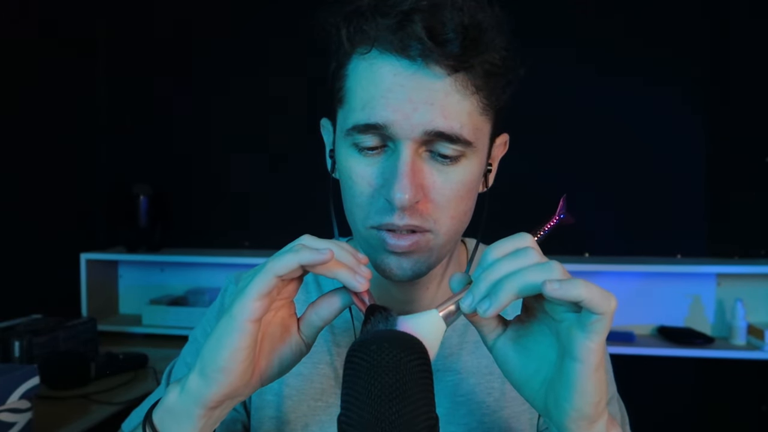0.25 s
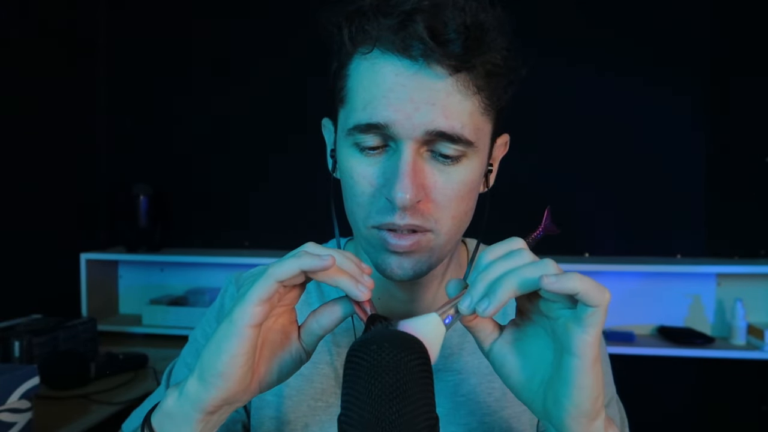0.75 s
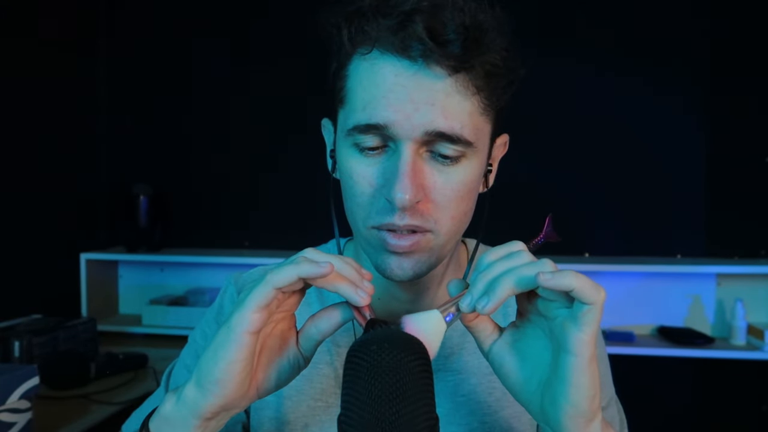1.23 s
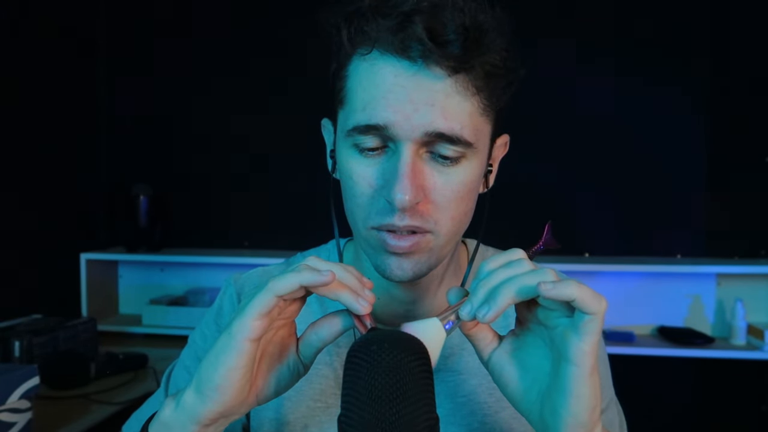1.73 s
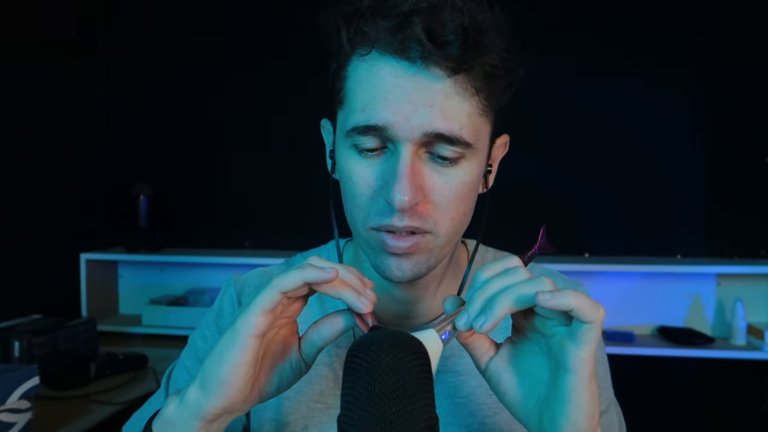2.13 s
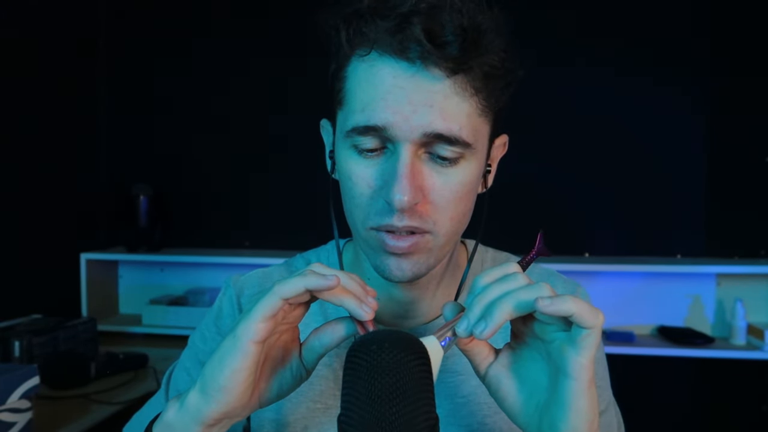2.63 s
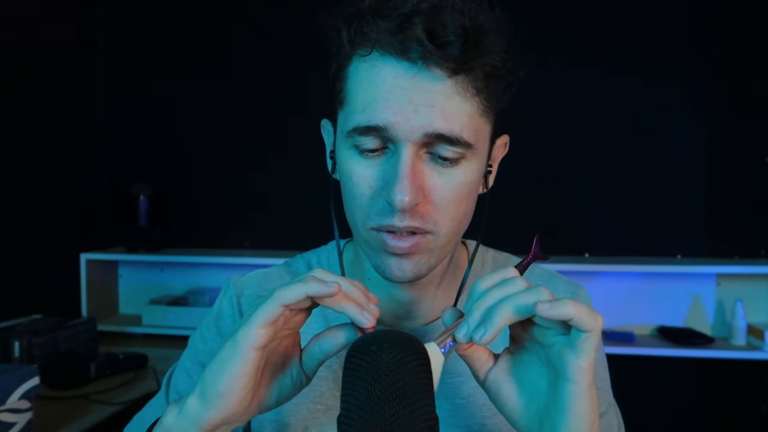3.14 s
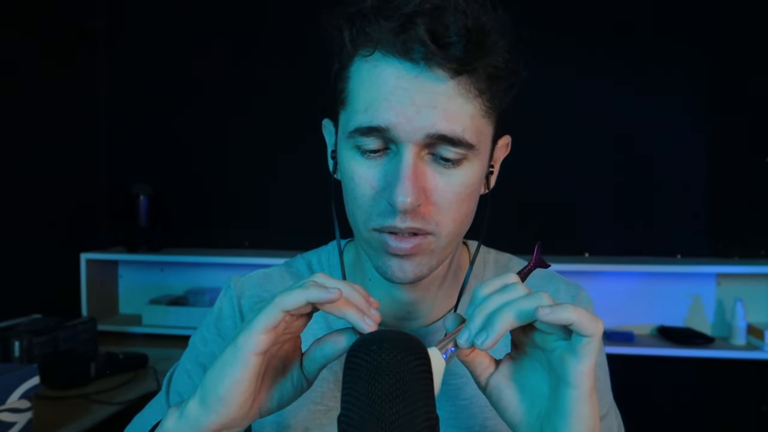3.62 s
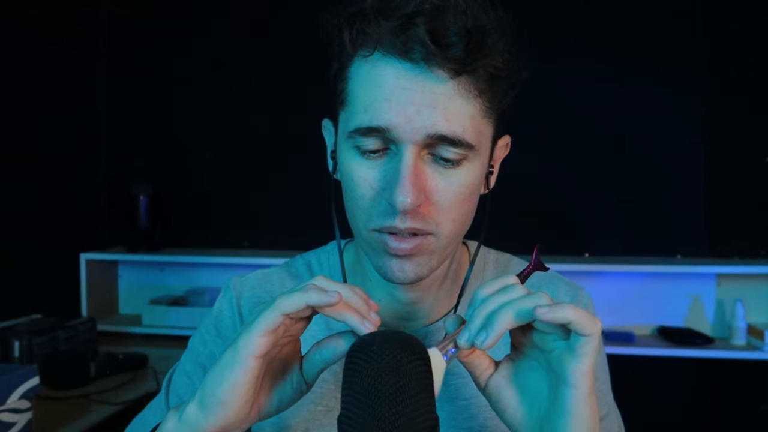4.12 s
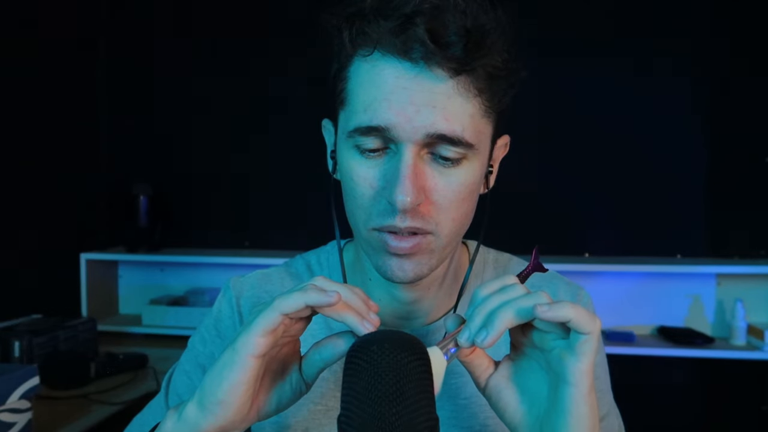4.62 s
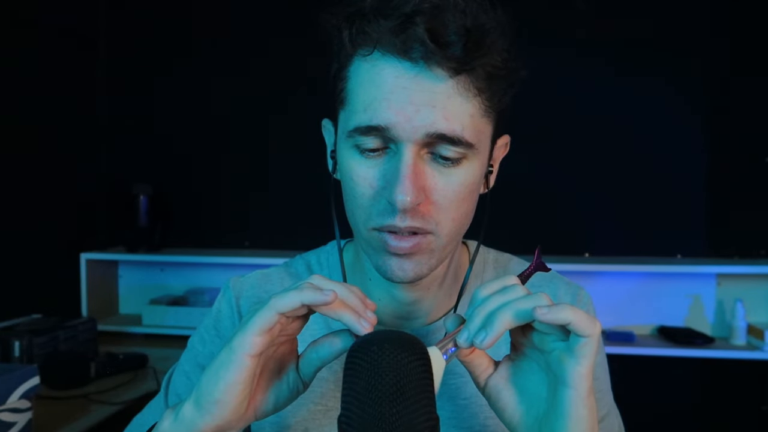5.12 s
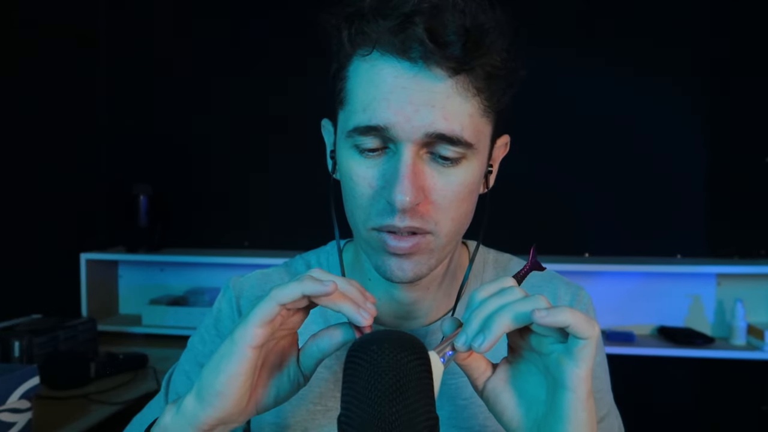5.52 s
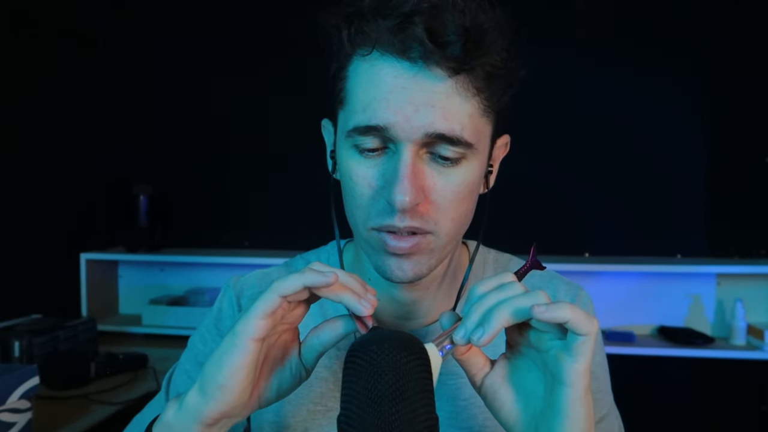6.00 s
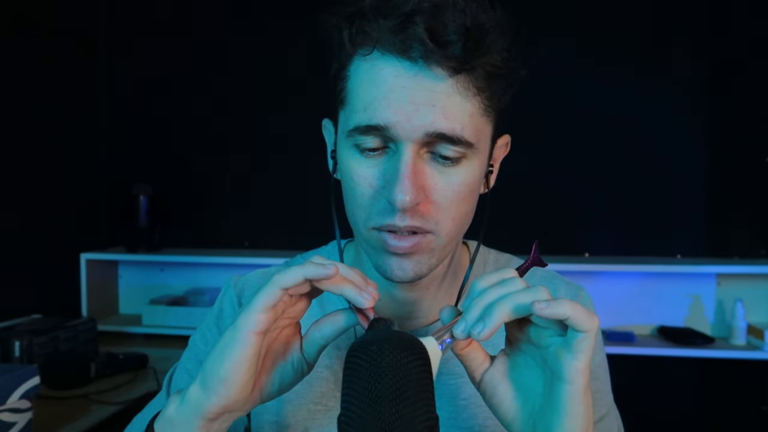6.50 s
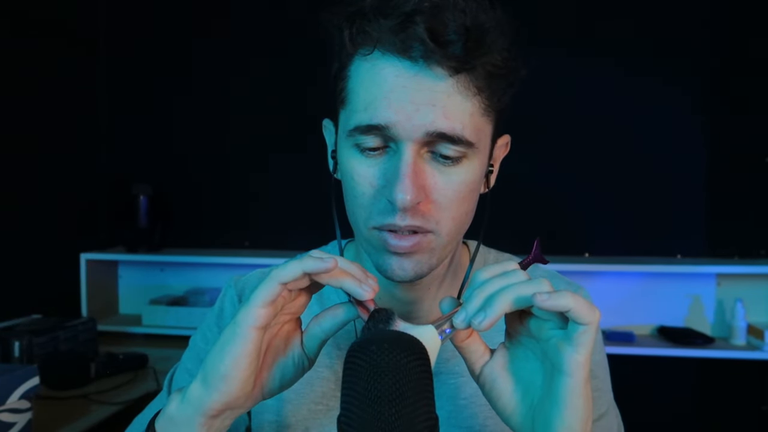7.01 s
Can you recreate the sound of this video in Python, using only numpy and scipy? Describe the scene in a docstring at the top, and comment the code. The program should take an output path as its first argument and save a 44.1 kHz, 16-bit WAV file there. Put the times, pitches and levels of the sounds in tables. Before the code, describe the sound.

A soft brush sweeps to and fro over a foam-covered microphone, each quick stroke a deep thump with a dull scuff, over low hum.

```python
"""Brush on a foam-capped stereo microphone

A soft brush sweeps to and fro over the foam, working from the top down its left side and back up.
Each stroke pushes a pulse of air into the capsules (a deep thump), shakes the resonant stand, and drags
bristles over the foam: random slips filtered to a scuff, a dull rub, a rasp and a fine hiss, with short rings.
Filtered noise and steady sines make a quiet room with mains hum underneath."""
import sys
import numpy as np
from scipy import signal
from scipy.fft import rfft, irfft
from scipy.io import wavfile

SR = 44100
rng = np.random.default_rng(int(sys.argv[2]) if len(sys.argv) > 2 else 0)


def transcribe(u):
    """Save the signal u as a 16-bit wav file named by the first command-line argument.

    u: samples, shape (n,) or (channels, n), limited to [-1, 1]; the rate is SR.
    q: integer samples, one column per channel.
    """
    v = np.clip(np.atleast_2d(u).T, -1, 1)
    q = np.round(v * 32767).astype(np.int16)
    wavfile.write(sys.argv[1], SR, q)


N = 319964
TIME = np.arange(N) / SR   # s

# Brush strokes, forward and return in turn; each layer adds its own offset to these levels:
# (peak time [s], swell time [s], relative push [dB], relative rub [dB], relative bite [dB])
STROKES = [(0.026, .009, -14.5, -69, -51.5), (0.32, 0.037, -18.5, -52, -57),
           (0.578, 0.0075, -16, -53.5, -52.5), (0.897, 0.016, -14, -55, -50.5),
           (1.212, 0.01, -16, -48, -49.5), (1.509, 0.0064, -13, -51, -57), (1.768, 0.016, -17, -44.5, -52),
           (2.084, 0.02, -16, -52, -65), (2.381, 0.014, -18.5, -48, -44.5), (2.638, 0.02, -21.5, -47, -49),
           (2.921, 0.016, -12.5, -47.5, -42), (3.22, 0.016, -15, -46, -56), (3.483, 0.023, -15, -49, -41),
           (3.757, 0.015, -17, -45.5, -61), (4.05, 0.014, -15, -46.5, -42),
           (4.292, 0.0079, -16.5, -45, -68), (4.592, .014, -16.5, -45, -41.5),
           (4.882, 0.021, -16, -47.5, -49), (5.146, 0.011, -16, -42.5, -40.5),
           (5.40, 0.015, -17.5, -46, -71), (5.678, 0.019, -17, -43.5, -46.5), (5.945, 0.038, -15, -48, -46),
           (6.228, 0.012, -11.5, -45.5, -40.5), (6.518, 0.023, -16, -41.5, -50),
           (6.771, 0.022, -14, -44, -46), (7.029, 0.046, -13, -47, -52.5),
           (7.258, 0.0068, -13.5, -38, -43.5)]


def from_db(db):
    """Level to amplitude: 20 dB is a factor of ten."""
    return 10 ** (np.asarray(db) / 20)


def rms_one(x):
    """Normalises each channel to unit root-mean-square amplitude."""
    return x / np.sqrt(np.mean(x ** 2, axis=-1, keepdims=True) + 1e-20)


def sides(right_db):
    """Level-difference stereo: gains of the left (0 dB) and right capsule."""
    return from_db(np.vstack([0 * right_db, right_db]))


def colour(x, spectrum):
    """Spectral shaping: white noise of rms 1 takes on the given power density, in dB per Hz."""
    hz, db = np.transpose(spectrum)
    bins = np.maximum(np.arange(N // 2 + 1) * SR / N, 1)
    gain = from_db(np.interp(np.log(bins), np.log(hz), db))
    return np.sqrt(SR / 2) * irfft(rfft(x) * gain, N)


def peak(s, rise, fall):
    """Exponential growth up to time s and exponential decay after it, with time constants in s."""
    before = (s - TIME) / max(rise, 0.001)
    after = (TIME - s) / max(fall, 0.001)
    return np.exp(-np.minimum(np.maximum(before, after), 40))


def bump(s, half_width):
    """Gaussian envelope, down to 1/e at half_width seconds either side of time s."""
    return np.exp(-((TIME - s) / half_width) ** 2)


def resonate(x, hz, width_hz):
    """Damped resonance: two poles whose radius sets the bandwidth, with a peak gain of 1."""
    r = np.exp(-np.pi * width_hz / SR)
    numerator = np.array([1, 0, -1]) * (1 - r * r) / 2
    return signal.lfilter(numerator, [1, -2 * r * np.cos(2 * np.pi * hz / SR), r * r], x)


def friction(spectrum, slips_per_s, spread_db, shared):
    """Friction as random impulses: uneven bristle slips, a share of them common to both capsules; rms 1."""
    unevenness_db = spread_db * np.minimum(rng.exponential(1, (3, N)), 4)
    sizes = from_db(unevenness_db) * rng.standard_normal((3, N))
    slips = sizes * (rng.random((3, N)) < slips_per_s / SR)
    heard = np.sqrt(1 - shared) * slips[:2] + np.sqrt(shared) * slips[2]
    return rms_one(colour(heard, spectrum))


def by_depth(s, pair):
    """Linear blend from the value on top to the value far down the side, for the brush's place at time s."""
    # how far the brush has worked down the side: (time [s], depth [0 on top to 1])
    depth_points = [(0, 0.043), (1.3, 0.14), (2.3, 0.66), (3.2, 0.86), (4.3, 1.0), (5.4, 0.93), (6.3, 0.62),
                    (7.25, 0.21)]
    depth = np.interp(s, *np.transpose(depth_points))
    return pair[0] + (pair[1] - pair[0]) * depth


def strokes():
    """Alternating motion: each stroke is paired with the habits of its direction."""
    # a pair is (on top, far down the side); pans are the right capsule's level re the left
    forward = dict(press_s=0.0063, release_s=(0.07, 0.085), push_pan_db=(-7.5, -4),
                   pan_db=(-2, -14), fade_s=(0.038, 0.074), hiss_db=(-58, -52))
    backward = dict(press_s=0.005, release_s=(0.026, 0.025), push_pan_db=(-7, -22),
                    pan_db=(-6.5, -21), fade_s=(0.018, 0.11), hiss_db=(-56.5, -52))
    return [((forward, backward)[k % 2], *row) for k, row in enumerate(STROKES)]


def room(shared=0.093):
    """Partly correlated noise fields make the room's rumble and hiss; sines add hum and appliance tones."""
    # noise density at each capsule: (frequency [Hz], density [dB per Hz])
    left_spectrum = [(15, -66), (30, -67), (55, -74), (110, -77), (160, -82.5), (230, -82.5), (320, -86),
                     (500, -90), (750, -92.5), (1700, -102), (2700, -103), (4000, -106), (10000, -113),
                     (16000, -116)]
    right_spectrum = [(15, -70), (30, -71), (55, -79), (80, -81), (110, -78), (160, -88), (320, -94),
                      (750, -101), (1100, -102), (1700, -106), (4000, -110), (10000, -114), (16000, -117.5)]
    # steady tones, mains hum first:
    # (frequency [Hz], left level [dB rms], right level [dB rms], lag of the right capsule [rad])
    tones = [(120, -52, -56, 1.5), (130.3, -68, -69, 1.6), (718.5, -75, -90, .2), (2000, -92, -89, 0),
             (3000, -92, -91, 0), (4000, -93, -92, 0)]
    left, right, both = rng.standard_normal((3, N))
    own, common = np.sqrt(1 - shared), np.sqrt(shared)
    air = np.array([colour(own * left + common * both, left_spectrum),
                    colour(own * right + common * both, right_spectrum)])
    air = signal.sosfilt(signal.butter(2, 14, "high", fs=SR, output="sos"), air)
    for hz, left_db, right_db, lag in tones:
        phase = 2 * np.pi * (hz * TIME + rng.random()) - np.array([[0], [lag]])
        air = air + from_db([[left_db], [right_db]]) * np.sqrt(2) * np.sin(phase)
    return air


def grazes(right_db=-5.0, half_width_s=0.039):
    """Light friction: the brush tips whisper over the foam between stroke peaks."""
    # moments of light touch: (time [s], left level [dB])
    touches = [(0.48, -65), (0.834, -60.5), (1.14, -63.5), (1.412, -58), (2.0, -57.5), (2.872, -66),
               (6.49, -59), (6.98, -63.5)]
    # shape of the whisper: (frequency [Hz], relative density [dB per Hz])
    whisper = [(100, -5), (400, -5), (800, -5), (1300, -2), (1700, -4), (2100, -9), (3000, -9), (6000, -20),
               (15000, -28)]
    touch = sum(from_db(db) * bump(s, half_width_s) for s, db in touches)
    return sides(right_db) * touch * friction(whisper, slips_per_s=2700, spread_db=-2.0, shared=0.16)


def stand(delay=0.015, rise=0.032, fall=0.074, level_db=1.0):
    """Forced resonance: the dragging brush shakes the stand, whose modes boom on after the stroke."""
    # modes of the stand: (frequency [Hz], bandwidth [Hz], left gain [dB], right gain [dB])
    modes = [(76, 9, -29, -38), (103, 12, -44, -30)]
    shake = sum(from_db(db + level_db) * peak(s + delay, rise, fall) for s, _, db, *_ in STROKES)
    out = 0
    for hz, width_hz, left_db, right_db in modes:
        # a narrow resonance passes less noise, so the force makes up for its width
        force = shake * rng.standard_normal((2, N)) * np.sqrt(SR / (np.pi * width_hz))
        out = out + from_db([[left_db], [right_db]]) * resonate(force, hz, width_hz)
    return out


def catches(pan_db=(-4, -18)):
    """Transient excitation: at each landing and each snag a decaying burst of slips rings the foam briefly."""
    # bristles snag and spring free: (time [s], fade time [s], left level at the start [dB])
    snag_points = [(1.797, 0.0032, -42.5), (1.995, .004, -49), (2.676, 0.0026, -46), (2.977, 0.0034, -39.5),
                   (6.518, 0.015, -40.5), (6.538, 0.0011, -32), (6.753, 0.0012, -44), (6.772, 0.034, -46)]
    bite_hz, bite_fade_s, bite_ring_db = 586, 0.0062, 2   # ring level is re the bite
    snag_hz = 880
    octaves_at_3_ms, narrowing = 2.13, 0.38   # longer rings are narrower by this power
    bites = [(s, bite_fade_s, db + bite_ring_db, bite_hz) for s, *_, db in STROKES]
    snags = [(s, fade, db, snag_hz) for s, fade, db in snag_points]
    out = np.zeros((2, N + SR))
    age = TIME[:SR // 8]
    for s, fade, db, hz in bites + snags:
        slips = rng.standard_normal(len(age)) * np.exp(-age / fade)
        octaves = octaves_at_3_ms * (0.003 / fade) ** narrowing
        edges_hz = [hz / 2 ** (octaves / 2), hz * 2 ** (octaves / 2)]
        band = signal.butter(2, edges_hz, "band", fs=SR, output="sos")
        # the factor lets the decaying burst start at about rms 1
        burst = rms_one(signal.sosfilt(band, slips)) * np.sqrt(fade / (2 * age[-1]))
        start = int(s * SR)
        out[:, start:start + len(age)] += sides(by_depth(s, pan_db)) * from_db(db) * burst
    return out[:, :N]


def bristles(rub_db=4.5, scuff_db=2.5, drag_db=-8.0, scuff_rise=0.007, scuff_fall=0.011, rub_lead=0.88,
             drag_delay=0.039, drag_length=0.017, bass_apart=1.77, stick_slip_db=1.0):
    """Stick-slip friction: the tuft bites with a scuff, slides with a dull rub and bright hiss, and rasps.

    Further down the side the slide fades more slowly, hisses more and sits further left."""
    # shapes of the four friction sounds: (frequency [Hz], relative density [dB per Hz])
    rub_spectrum = [(50, -20), (110, 5), (220, 0), (400, -4.5), (700, -16.5), (1200, -13.5), (1900, -30),
                    (2900, -25), (4500, -34), (15000, -41)]
    drag_spectrum = [(300, -3), (800, -3), (1300, 1), (1700, -9), (2200, -8.5), (2900, -9), (4500, -35),
                     (15000, -44)]
    scuff_spectrum = [(60, 7), (130, -18), (260, 3.5), (500, -3), (1000, -3), (1800, -10.5), (3000, -11.5),
                      (5000, -24.5), (15000, -28)]
    hiss_spectrum = [(500, -38), (1500, 7), (3000, -0.5), (4500, 1), (6000, -3.5), (9000, -0.5),
                     (11000, -6.5), (13500, -4.5), (16000, -10)]
    contact_s, lift_s = 0.086, 0.013   # how long the tuft stays on the foam, how quickly it lifts
    hiss = rub = drag = scuff = 0
    for way, s, swell, _, rub_level, bite_level in strokes():
        right_db = by_depth(s, way["pan_db"])
        wide = sides(right_db)
        close = sides(right_db * bass_apart)   # the dull parts stay closer to the capsule under the brush
        fade = np.exp(by_depth(s, np.log(way["fade_s"])))
        touching = (1 - np.tanh((TIME - s - contact_s) / (2 * lift_s))) / 2
        hiss_gain = from_db(by_depth(s, way["hiss_db"]))
        hiss = hiss + wide * (touching * hiss_gain * peak(s, swell, fade))
        drag = drag + wide * (from_db(rub_level + drag_db) * bump(s + drag_delay, drag_length))
        rub = rub + close * (touching * from_db(rub_level + rub_db) * peak(s, swell * rub_lead, fade))
        scuff = scuff + close * (from_db(bite_level + scuff_db) * peak(s, scuff_rise, scuff_fall))
    # clumps of bristles stick and slip together: a flutter of level around 150 Hz
    flutter = rms_one(resonate(rng.standard_normal(N), 150, 230))
    grip = from_db(stick_slip_db * flutter)
    coarse = (rub * friction(rub_spectrum, slips_per_s=6600, spread_db=2.0, shared=0.24)
              + drag * friction(drag_spectrum, slips_per_s=4600, spread_db=0.5, shared=0.092)
              + scuff * friction(scuff_spectrum, slips_per_s=5300, spread_db=4.0, shared=0.49))
    fine = hiss * friction(hiss_spectrum, slips_per_s=25000, spread_db=-1.0, shared=0.078)
    return grip * coarse + fine


def thumps(capsule_hz=12.64, capsule_q=2.77, low_cut_hz=17.2, foam_hz=286.0, level_db=1.85):
    """Pulse response: foam rounds each pressure pulse; the capsule's resonant bass roll-off makes it wobble."""
    pressure = 0
    for way, s, _, push_db, *_ in strokes():
        pulse = peak(s, way["press_s"], by_depth(s, way["release_s"]))
        pan = sides(by_depth(s, way["push_pan_db"]))
        pressure = pressure - from_db(push_db + level_db) * pan * pulse
    w = 2 * np.pi * capsule_hz
    roll_off = signal.bilinear([1, 0, 0], [1, w / capsule_q, w * w], SR)   # second-order high-pass
    swing = signal.lfilter(*roll_off, pressure)
    return signal.sosfilt(signal.butter(2, [low_cut_hz, foam_hz], "band", fs=SR, output="sos"), swing)


def scene():
    """Superposition in the near field: all sounds of the brush arise at the capsules, without reverberation."""
    return room() + grazes() + stand() + catches() + bristles() + thumps()


def record(dry):
    """Band limiting: a steep elliptic low-pass removes the top above 15.7 kHz."""
    return signal.sosfilt(signal.ellip(12, 0.1, 90, 15700, fs=SR, output="sos"), dry)


dry = scene()
out = record(dry)
transcribe(out)
```